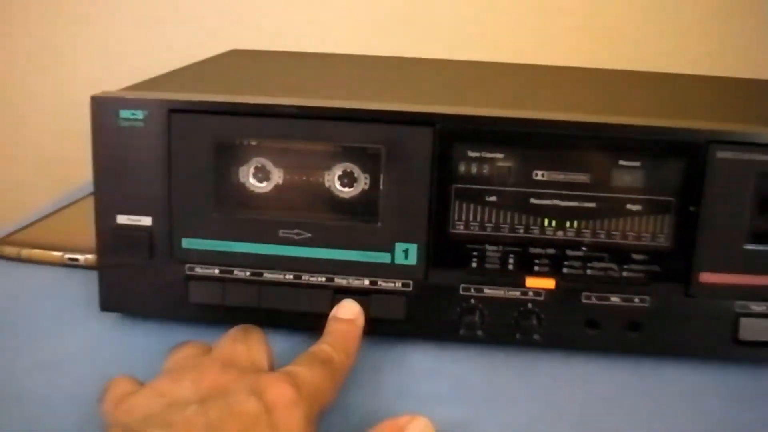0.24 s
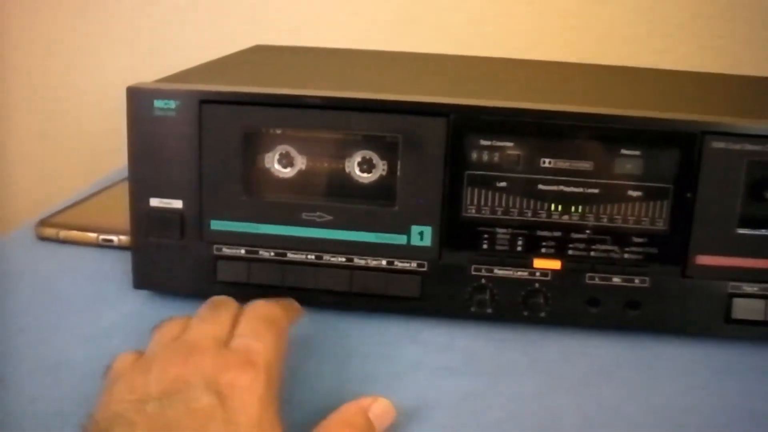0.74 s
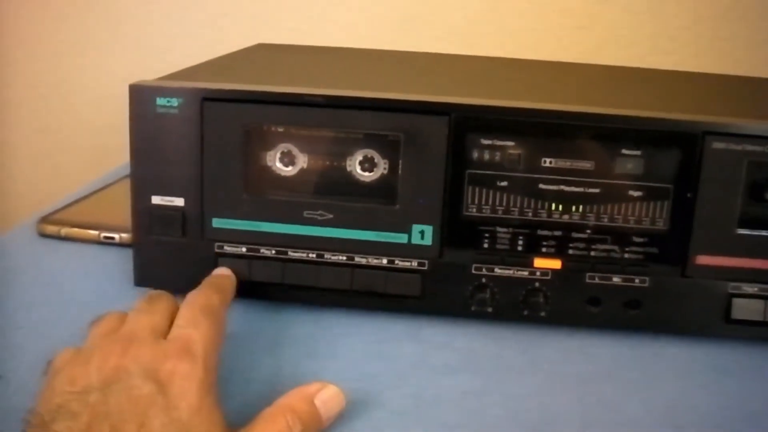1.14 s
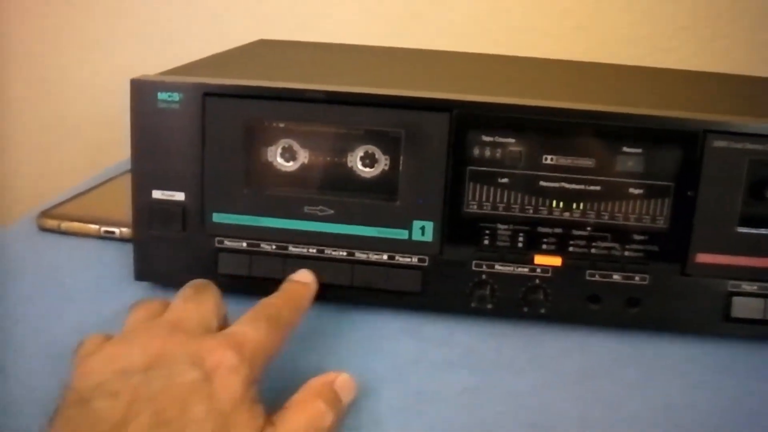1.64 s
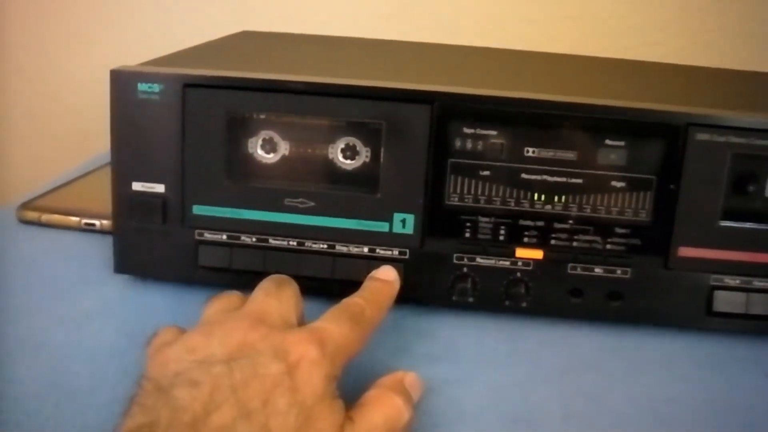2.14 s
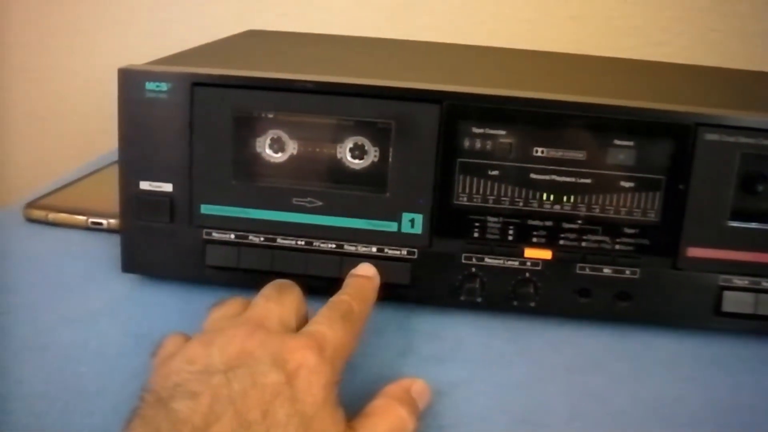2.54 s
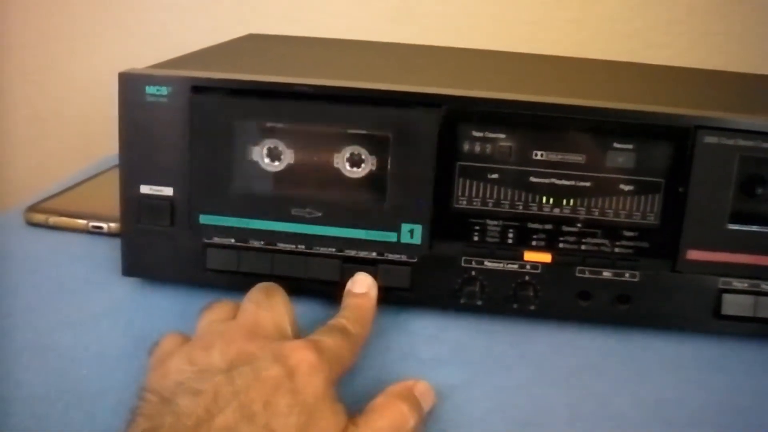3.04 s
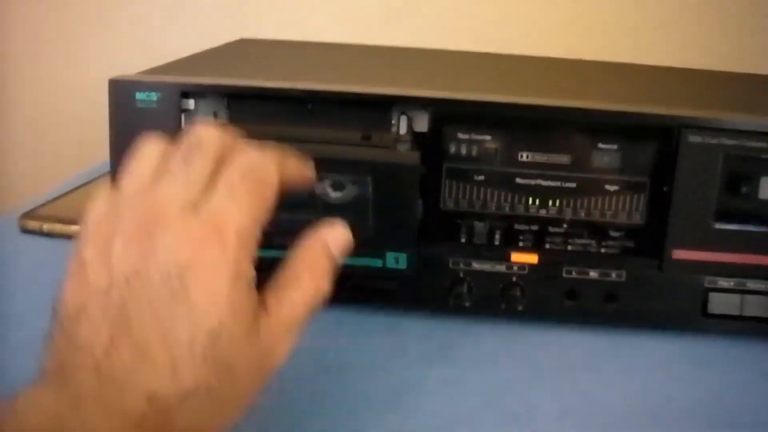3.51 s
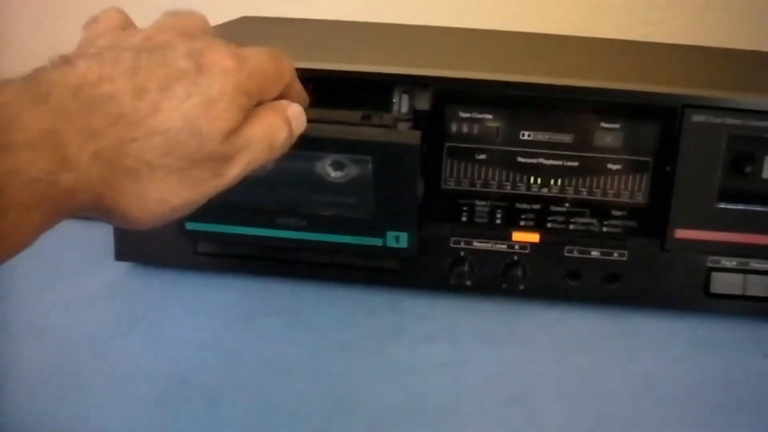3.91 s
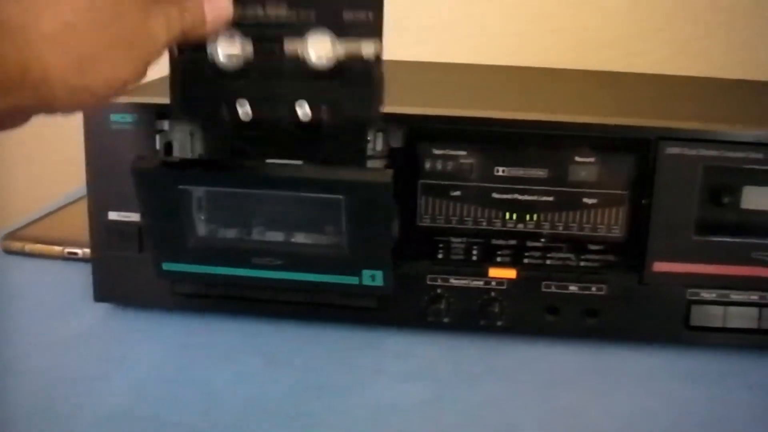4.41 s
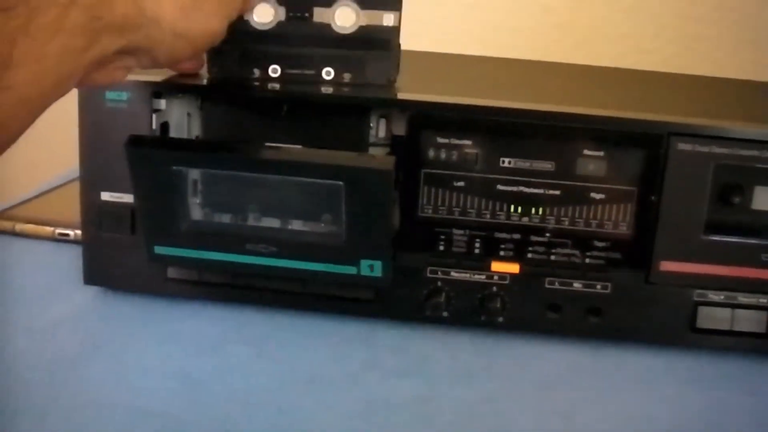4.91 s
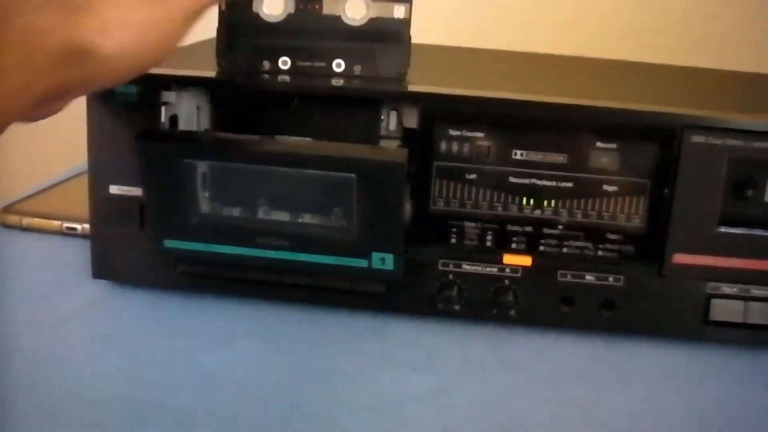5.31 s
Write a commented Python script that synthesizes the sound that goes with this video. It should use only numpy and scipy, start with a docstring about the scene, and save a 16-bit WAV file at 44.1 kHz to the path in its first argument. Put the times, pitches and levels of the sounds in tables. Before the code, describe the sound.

A cassette deck key clacks sharply, followed by a brief buzzing run of camera lens motor and a softer key click. Small irregular motor ticks continue near the microphone. The plastic door then springs open with a rattling clatter, the tape scrapes out with a loud snap, and it lands on the metal lid in two knocks. Quiet indoor room, faint hiss and whirr.

```python
"""A cassette deck in a quiet room: its keys are worked, the door springs open, the tape is slid out and
set down on the sheet-metal lid. Each knock is a noise rattle ringing the modes of the part struck.
The lens motor of a hand-held camera ticks and buzzes next to the microphones: gear clicks, housing thuds.
Behind lie the faint whirr of the deck motor (pulses ringing two modes), steady tones and filtered hiss."""
import sys
import numpy as np
from scipy import signal
from scipy.fft import rfft, irfft
from scipy.io import wavfile
from scipy.ndimage import uniform_filter1d

SR = 44100
rng = np.random.default_rng(int(sys.argv[2]) if len(sys.argv) > 2 else 0)


def wrap_up_sound(samples):
    """Save the sound to the file named by the first command line argument, as 16-bit audio."""
    columns = np.atleast_2d(samples).T
    # keep every value between -1 and 1, then stretch to whole-number steps
    tamed = np.clip(columns, -1, 1)
    steps = np.round(tamed * 32767).astype(np.int16)
    wavfile.write(sys.argv[1], SR, steps)


def gain_from_db(level_db):
    """Convert decibel levels to linear amplitude factors (20 dB per decade)."""
    decades = np.asarray(level_db, float) / 20
    return 10 ** decades


N = 245195

# Knocks: (time [s], peak before pan and microphones [dB], treble setting [dB], rattle hold [s], dull rattle T60 [s])
KEY_KNOCKS = [(0.1445, -26.5, -18, .001, 0.21), (0.149, -9.5, 14.5, 0.0068, 0.025),
              (0.488, -33, -31, .005, 0.049), (0.5125, -24, -8, 0.0011, 0.11),
              (0.519, -16.5, 9.5, 0.0012, 0.034)]
DOOR_KNOCKS = [(3.0772, -23, -15, 0.0015, 0.041), (3.082, -11, -1, 0.0043, 0.041),
               (3.0875, -9, -15, 0.0009, 0.018), (3.0985, -19.5, -5, 0.0018, 0.032),
               (3.115, -20, 4, 0.0033, 0.042), (3.1225, -18.5, -2, 0.0094, 0.05),
               (3.137, -24, 5, 0.005, 0.067), (3.148, -28, 18, 0.0067, 0.087)]
TAPE_KNOCKS = [(2.841, -33.5, 1, 0.0027, 0.06), (3.338, -31.5, -0.5, 0.0071, 0.13),
               (3.591, -34, -23, 0.013, 0.031), (3.649, -32, 1, 0.0013, 0.013),
               (3.765, -30.5, -41, 0.0065, 0.03), (3.771, -28, 34, 0.0008, 0.013),
               (4.0225, -20, -15, .001, 0.018), (4.263, -27.5, 10, .001, 0.055),
               (4.279, -33, -11, 0.00096, 0.028), (4.354, -23.5, 2, .01, 0.055),
               (4.378, -14.5, 2, 0.0015, 0.12), (4.3822, 1.5, 8, 0.00038, 0.013),
               (4.404, -14, 4, 0.0046, 0.086), (4.479, -27, 13, 0.003, 0.072)]
LID_KNOCKS = [(4.8786, -4.5, -1.5, 0.012, 0.099), (4.902, -13.5, 7.5, 0.0018, 0.21),
              (4.9448, -5, 0, 0.011, 0.064), (4.96, -11, 7, 0.019, 0.13)]
# Modes of the struck parts: (frequency [Hz], width before damping factor [Hz], spectral height [dB])
KEY_MODES = [(990, 140, 4.5), (1710, 300, 1.5), (2480, 50, -39), (3560, 120, 1), (4800, 140, -6),
             (5000, 170, -5), (5720, 310, -5), (6850, 200, -21), (9200, 83, -30)]
DOOR_MODES = [(750, 136, 9), (1260, 114, 6), (1835, 62, -1), (2250, 670, -9), (3270, 190, -31),
              (3980, 310, -8.5), (4700, 130, -7), (5960, 430, -8)]
TAPE_MODES = [(831, 15, 1), (1305, 74, 3.5), (1790, 75, 0), (2030, 92, -17), (2640, 190, -3.5),
              (3070, 99, -7), (3620, 50, -7), (5100, 310, -2.5), (6100, 190, -6.5), (9500, 790, -10)]
LID_MODES = [(1080, 17, -6), (1300, 32, -14), (1437, 34, 3.5), (1720, 170, -2.5), (2270, 62, -9),
             (2480, 95, -11), (2850, 400, -8), (3600, 280, -8.5), (4950, 910, -14.5), (6580, 150, -14)]
# Deck case, rung by every knock: (frequency [Hz], width [Hz], spectral height [dB])
CASE_MODES = [(213, 15, -27), (270, 38, -25), (336.8, 25.6, 13), (513.6, 4.7, 9), (586, 91, -9),
              (863, 127, 3)]
# Left-right likeness of contact noise: (frequency [Hz], correlation [-1..1])
CONTACT_LIKENESS = [(300, 1), (1400, 0.91), (3100, 0.99), (7000, 0.16)]
# Door spring: (level before swell [dB], frequency [Hz], T60 [s])
DOOR_SPRING = (-18.5, 6298, 0.083)
# Tape sliding in its guides: (time [s], level [dB], hiss trim against the rest [dB])
TAPE_SLIDE = [(4.14, -68, 12), (4.177, -37, -9.5), (4.199, -42.5, -4), (4.25, -45.5, -1.5),
              (4.298, -41, -11), (4.32, -67, 18), (4.336, -66, 4)]
# Clear lens motor steps: (time [s], snap peak before high-pass [dB])
LENS_STEPS = [(0.7041, -25), (0.727, -18), (0.7933, -31.5), (0.926, -32.5), (0.964, -31), (1.1265, -29.5),
              (1.2633, -18), (1.3657, -26), (1.467, -32), (1.5655, -23.5), (1.6658, -32), (1.7668, -23),
              (2.0684, -27.5), (2.3875, -22), (2.4126, -18), (2.612, -28), (2.6492, -31), (2.7871, -25),
              (2.8125, -24.5), (2.8788, -24.5), (2.9458, -23.5), (3.279, -29), (3.3207, -28), (3.922, -23),
              (3.9476, -22.5), (4.3477, -26), (4.4843, -32), (4.548, -22.5), (4.5895, -31), (4.6189, -24),
              (4.6675, -30), (4.7723, -30), (4.8227, -34.5), (5.1906, -21), (5.2148, -16), (5.256, -29.5),
              (5.3253, -31), (5.5271, -28)]
# Faint even lens steps as the focus hunts: (first [s], until [s], interval [s], mean snap [dB], mean thud [dB])
FAINT_TRAINS = [(1.467, 1.84, .05005, -40, -43), (2.4793, 3.04, .06675, -46, -46),
                (3.3873, 4.15, .0668, -34, -45), (3.4145, 3.9, .0668, -47, -43)]
# Lens motor run: (time [s], snap peak before high-pass [dB])
LENS_RUN = [(.24, -51), (.269, -26), (.273, -66), (.28, -32), (.306, -30.5), (.312, -30.5), (.335, -28),
            (.357, -33), (.367, -23.5), (.395, -31), (.416, -22.5), (0.442, -30.5)]
# Lens housing, thud first: (frequency [Hz], width [Hz], spectral height [dB])
HOUSING_MODES = [(1064, 154, 0), (2520, 93, 1), (3990, 137, 11.5), (5350, 410, 5.5), (6590, 430, 14),
                 (7130, 680, 7.5), (8600, 900, -40), (11700, 1200, -47)]
# Gears in a run: (frequency [Hz], width [Hz], spectral height before band-pass [dB])
RUN_MODES = [(3920, 440, -12), (5200, 380, -1), (5640, 680, -3), (6750, 1100, 5), (7200, 240, -3),
             (8800, 740, -2)]
# Deck motor contacts in one turn: (share of turn [0..1], mean relative level [dB])
MOTOR_CONTACTS = [(0.017, 5), (0.272, -10), (0.521, 5), (.6, 8), (0.773, 4)]
# Whirr as the hand and the open door shade or bare it: (time [s], upper mode rms [dB], lower mode rms [dB]),
# both before the left-right offset
WHIRR_LEVEL = [(0, -83, -84), (.6, -63, -80), (3.1, -66.5, -86), (3.3, -68, -69), (4.1, -68, -60.5),
               (4.5, -64.5, -74), (5.56, -64, -79)]
# Whirr, upper then lower: (frequency [Hz], width of one ringing [Hz], height [dB])
WHIRR_MODES = [(6260, 240, 0), (6080, 180, 0)]
# Steady tones: (frequency [Hz], rms [dB])
STEADY_TONES = [(414.5, -69), (565, -69.5), (6202, -72)]
# Hiss spectrum: (frequency [Hz], relative density [dB])
HISS_SPECTRUM = [(35, -9.5), (60, -11.5), (126, -15.5), (226, -6), (403, -4), (849, -6.5), (976, -6),
                 (1380, -8), (1870, -10), (4420, -14), (6410, -13.5), (7900, -17), (12600, -20),
                 (14100, -29), (15500, -61)]
# Hiss level course: (time [s], gain [dB])
HISS_LIFT = [(0, -0.5), (.14, 5), (.6, 0.5), (1, -1.5), (3, -1), (4.5, 0.5), (5.56, -1)]
# Left-right likeness of hiss: (frequency [Hz], correlation [-1..1])
HISS_LIKENESS = [(100, 0.16), (400, 0.46), (1400, 0.094), (6000, 0.13)]
# Room decay: (frequency [Hz], T60 [s])
ROOM_T60 = [(200, 0.56), (600, 0.53), (1400, 0.35), (3700, 0.21), (10000, 0.24)]


def unit_rms(x):
    """Scales to rms 1."""
    return x / np.sqrt(np.mean(x ** 2) + 1e-20)


def at_frequency(points, hz):
    """Interpolates a spectrum table on a log-frequency axis."""
    f, value = np.transpose(points)
    return np.interp(np.log(hz + 1), np.log(f + 1), value)


def add(mix, start_s, sound):
    """Mixes a sound in at start_s, cut at the end of the mix."""
    part = mix[..., round(start_s * SR):][..., :sound.shape[-1]]
    part += sound[..., :part.shape[-1]]


def colour(x, points):
    """Zero-phase filter with a smooth (frequency [Hz], gain [dB]) spectrum."""
    gain_db = at_frequency(points, np.fft.rfftfreq(x.shape[-1], 1 / SR))
    return irfft(rfft(x) * gain_from_db(gain_db), x.shape[-1])


def ring(modes, seconds):
    """Sum of decaying sines; amplitude scales with width so that dB sets spectral height."""
    t = np.arange(round(seconds * SR)) / SR
    out = 0
    for hz, width_hz, db in modes:
        decay = np.exp(-np.pi * width_hz * t)
        out = out + gain_from_db(db) * width_hz * decay * np.sin(2 * np.pi * hz * t)
    return out


def noise_pair(size, likeness):
    """Two white noises whose correlation follows frequency."""
    a, b = rfft(rng.standard_normal((2, size)))
    c = np.clip(at_frequency(likeness, np.fft.rfftfreq(size, 1 / SR)), -1, 1)
    return irfft([a, c * a + np.sqrt(1 - c ** 2) * b], size)


def knocks(rows, modes, case_db, crack_db, grit_db, damping, rise_s, bass_db, crisp,
           after_db, after_t60_s, after_bass_db):
    """Rattles of uneven contacts crack, ring the part and boom the case; a dull shudder dies away after.
    crisp is the bass lost per dB of knock level [dB/dB]."""
    lead_s, place_spread_db, sharp_fall = .01, 2.5, 1.15
    out = np.zeros((2, N))
    t = np.arange(12288) / SR - lead_s
    case = ring(CASE_MODES, .15)
    for start_s, peak_db, treble_db, hold_s, t60_s in rows:
        # each spot struck favours other modes
        place_db = place_spread_db * rng.standard_normal(len(modes))
        struck = [(hz, width_hz * damping, db + d) for (hz, width_hz, db), d in zip(modes, place_db)]
        part = ring(struck, .15)
        body = part / np.linalg.norm(part) + gain_from_db(case_db) * case / np.linalg.norm(case)
        body[0] += gain_from_db(crack_db)

        contacts = noise_pair(len(t), CONTACT_LIKENESS)
        contacts *= gain_from_db(grit_db * uniform_filter1d(rng.standard_normal(len(t)), 16))
        contacts *= np.clip(t / rise_s, 0, 1)
        late_s = np.maximum(t - rise_s - hold_s, 0)
        fall_db = -60 * late_s / t60_s
        low_db = bass_db - crisp * peak_db

        dull_spectrum = [(140, low_db - 22.5), (330, low_db), (2000, 4.0), (4000, -6.5), (9000, -24.5)]
        dull = colour(contacts * gain_from_db(fall_db), dull_spectrum)
        # later contacts are softer, so duller: the treble falls faster
        sharp_spectrum = [(1500, -19.5), (4000, 0.37 * treble_db - 1.0), (7000, treble_db),
                          (15000, treble_db - 16.5)]
        sharp = colour(contacts * gain_from_db(sharp_fall * fall_db), sharp_spectrum)
        after_spectrum = [(140, after_bass_db - 1), (330, after_bass_db), (2000, 6), (4000, -10), (9000, -7)]
        after = colour(contacts * gain_from_db(after_db - 60 * late_s / after_t60_s), after_spectrum)

        sound = signal.fftconvolve(dull + sharp + after, body[None], axes=1)
        peak = np.sqrt((sound[:, :1400] ** 2).mean(0).max())
        add(out, start_s - lead_s, gain_from_db(peak_db) * sound / peak)
    return out


def door_spring():
    """One thin mode that swells in and dies."""
    start_s, swell_s = 3.139, .012
    db, hz, t60_s = DOOR_SPRING
    t, out = np.arange(SR // 4) / SR, np.zeros(N)
    swell = (1 - np.exp(-t / swell_s)) ** 2
    add(out, start_s, gain_from_db(db - 60 * t / t60_s) * swell * np.sin(2 * np.pi * hz * t))
    return out


def tape_slide():
    """Dense, clumped grit under the stroke rings the tape shell, with rasp and hiss on top."""
    s, db, hiss_db = np.transpose(TAPE_SLIDE)
    t, out = np.arange(s[0], s[-1], 1 / SR), np.zeros((2, N))
    grit = noise_pair(len(t), CONTACT_LIKENESS)
    grit = grit * gain_from_db(1.5 * unit_rms(uniform_filter1d(rng.standard_normal(len(t)), 150)))
    shell = signal.fftconvolve(grit, ring(TAPE_MODES[:6], .05)[None], axes=1)[:, :len(t)]
    rasp = colour(grit, [(300, -28), (900, 0.5), (2500, -1.0), (4000, -23), (8000, -23)])
    top = colour(grit, [(2000, -8), (5000, -0.5), (9000, -5), (14000, -17)])
    sound = 0.36 * unit_rms(shell) + 0.66 * unit_rms(rasp)
    sound = sound + gain_from_db(np.interp(t, s, hiss_db)) * unit_rms(top)
    add(out, s[0], gain_from_db(np.interp(t, s, db)) * sound)
    return out


def single_steps():
    """Clear steps, thud tied to snap, plus faint hunting steps: (time [s], snap [dB], thud [dB])."""
    thud_db, thud_slope = -25.5, 0.58
    slack_s, slack_db = .032, -6.5
    spread_db, clearance_s = 2.5, .008
    s, db = np.transpose(LENS_STEPS)
    # a step soon followed by another only takes up slack: weaker thud
    slack = np.diff(s, append=np.inf) < slack_s
    rows = list(zip(s, db, thud_db + thud_slope * db + slack_db * slack))
    chances = rng.standard_normal((len(FAINT_TRAINS), 32, 2))
    for (first_s, until_s, gap_s, faint_snap_db, faint_thud_db), chance in zip(FAINT_TRAINS, chances):
        for at_s, (a, b) in zip(np.arange(first_s, until_s, gap_s), spread_db * chance):
            if abs(s - at_s).min() > clearance_s:
                rows.append((at_s, faint_snap_db + a, faint_thud_db + b / 2))
    return rows


def lens_motor():
    """Each step is a millisecond of gear chatter and a housing thud; a run is like steps in quick train."""
    steps_per_s, first_step_s = 240.0, .2598
    run_loose, single_loose = .065, .12
    run_thud_db, rasp_db = -16, -23  # against the run's snap
    snaps, thuds = np.zeros((2, 2, N))
    s, db = np.transpose(LENS_RUN)

    snap = ring(HOUSING_MODES[1:], .008)
    run_gears = ring(RUN_MODES, .008)
    thud = ring(HOUSING_MODES[:1], 0.02)
    run_band = signal.butter(4, [2200, 8500], "band", fs=SR, output="sos")
    run_gears = signal.sosfilt(run_band, run_gears)
    snap[0] += 1.04 * abs(snap).max()  # bare crack at the front
    thud = np.convolve(thud, ring([(HOUSING_MODES[0][0], 900, 0)], .003))  # soft start
    # a run damps the housing: broad low resonance
    low = ring([(1070, 540, 0)], .004)
    run_thud = np.convolve(low, low)

    every = []
    for at_s in first_step_s + np.arange(-5, 44) / steps_per_s:
        snap_db = np.interp(at_s, s, db)
        every.append((at_s, snap_db, snap_db + run_thud_db, run_loose, run_gears, run_thud))
    every += [(*step, single_loose, snap, thud) for step in single_steps()]

    chances = rng.standard_normal((len(every), 2, 64))
    for (at_s, snap_db, thud_db, loose, gears, boom), chance in zip(every, chances):
        chatter = loose * (chance[0] + chance) * signal.windows.hann(64)
        chatter[:, 24] += 1.3  # main contact
        click = signal.fftconvolve(chatter, gears[None], axes=1)
        add(snaps, at_s - .0003, gain_from_db(snap_db) * click / abs(click).max())
        add(thuds, at_s, gain_from_db(thud_db) * np.outer([.9, 1.1], boom) / abs(boom).max())

    # gear hiss between the steps of the run
    t = np.arange(s[0], s[-1], 1 / SR)
    rasp = noise_pair(len(t), CONTACT_LIKENESS)
    rasp = signal.fftconvolve(rasp, run_gears[None], axes=1)[:, :len(t)]
    add(snaps, s[0], gain_from_db(rasp_db + np.interp(t, s, db)) * unit_rms(rasp))
    high_pass = signal.butter(2, 2200, "high", fs=SR, output="sos")
    return signal.sosfilt(high_pass, snaps) + thuds


def deck_motor():
    """The same brush contacts recur every turn and ring two high modes; a few faint steady tones."""
    turns_per_s, spread_db = 28.05, 0.57
    contacts, t = np.zeros(N), np.arange(N) / SR
    for share, db in MOTOR_CONTACTS:
        at = ((np.arange(155) + share) / turns_per_s * SR).astype(int)
        contacts[at] = gain_from_db(db + spread_db * rng.standard_normal(len(at)))
    s, *levels_db = np.transpose(WHIRR_LEVEL)
    whirr = np.zeros(N)
    for level_db, mode in zip(levels_db, WHIRR_MODES):
        once = ring([mode], .01)
        rung = signal.oaconvolve(contacts, np.convolve(once, once))[:N]  # rung twice: soft start
        whirr += gain_from_db(np.interp(t, s, level_db)) * unit_rms(rung)
    tones = np.zeros(N)
    for hz, db in STEADY_TONES:
        tones += gain_from_db(db) * np.sqrt(2) * np.sin(2 * np.pi * (hz * t + rng.random()))
    return whirr * gain_from_db([[1.5], [-1.5]]) + tones


def hiss():
    """Room air and microphone noise, shaped in spectrum and level; loudest about the first key knocks."""
    base_db = -51
    s, lift_db = np.transpose(HISS_LIFT)
    noise = unit_rms(colour(noise_pair(N, HISS_LIKENESS), HISS_SPECTRUM))
    return noise * gain_from_db(base_db + np.interp(np.arange(N) / SR, s, lift_db))


def room(x):
    """Reverberation: sparse random-sign taps, one in every 20 samples, each band with its own decay."""
    taps = np.zeros((2, SR // 2))
    at = np.arange(200, SR // 2 - 20, 20) + rng.integers(0, 20, (2, (SR // 2 - 201) // 20))
    np.put_along_axis(taps, at, rng.choice([-1., 1.], at.shape), 1)
    taps[1] = 0.82 * taps[0] + 0.57 * taps[1]
    hz, t, z = signal.stft(taps, SR, nperseg=256)
    decay_db = -60 * t / at_frequency(ROOM_T60, hz)[:, None]
    tail = signal.istft(z * gain_from_db(decay_db), SR, nperseg=256)[1]
    return signal.fftconvolve(x[None], tail / np.linalg.norm(tail[0]), axes=1)[:, :N]


def scene():
    """Deck slightly right with reverberation, lens slightly left, over deck motor and hiss."""
    mic_low_hz, mic_high_hz, room_db = 191, 13060, -13
    deck = knocks(KEY_KNOCKS, KEY_MODES, case_db=2.0, crack_db=-0.5, grit_db=7.5, damping=3.4,
                  rise_s=0.0043, bass_db=-45, crisp=0.95,
                  after_db=-20, after_t60_s=0.27, after_bass_db=-5.5)
    deck += knocks(DOOR_KNOCKS, DOOR_MODES, case_db=-13, crack_db=-2, grit_db=9, damping=1.0,
                   rise_s=0.0011, bass_db=-41.5, crisp=0.17,
                   after_db=-28.5, after_t60_s=0.073, after_bass_db=3)
    deck += knocks(TAPE_KNOCKS, TAPE_MODES, case_db=-1.5, crack_db=5.5, grit_db=19.5, damping=2.1,
                   rise_s=0.0014, bass_db=-54, crisp=1.43,
                   after_db=-22.5, after_t60_s=0.13, after_bass_db=-6.5)
    deck += knocks(LID_KNOCKS, LID_MODES, case_db=0.0, crack_db=3.5, grit_db=6.5, damping=1.67,
                   rise_s=0.001, bass_db=-3.5, crisp=0.13,
                   after_db=-17.5, after_t60_s=0.55, after_bass_db=2.5)
    deck += door_spring() + tape_slide()
    deck += gain_from_db(room_db) * room(deck.mean(0))
    events = deck * gain_from_db([[-.7], [.7]]) + lens_motor() * gain_from_db([[.3], [-.3]])
    # small microphones pass neither deep bass nor top treble
    mic_band = signal.butter(7, [mic_low_hz, mic_high_hz], "band", fs=SR, output="sos")
    return signal.sosfilt(mic_band, events) + deck_motor() + hiss()


def top_cut(x):
    """Nothing passes above the cut-off."""
    return signal.sosfilt(signal.butter(12, 16640, fs=SR, output="sos"), x)


def record(dry):
    """Microphone chain: narrow partial dip, soft rounding of the highest peaks, small offset."""
    notch_hz, notch_width_hz = 7870, 300
    ceiling, offset = .95, .0027
    notched = signal.lfilter(*signal.iirnotch(notch_hz, notch_hz / notch_width_hz, SR), dry)
    dipped = .8 * notched + .2 * dry
    mix = ceiling * np.tanh(dipped / ceiling) + offset
    return top_cut(mix)


dry = scene()
out = record(dry)
wrap_up_sound(out)
```